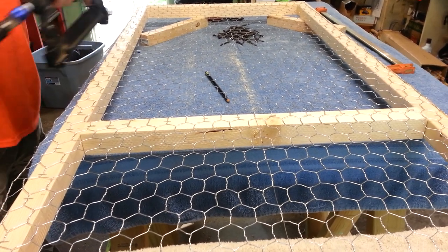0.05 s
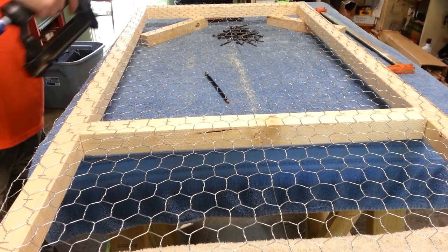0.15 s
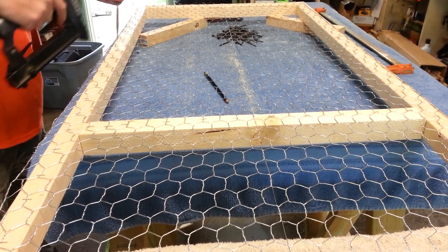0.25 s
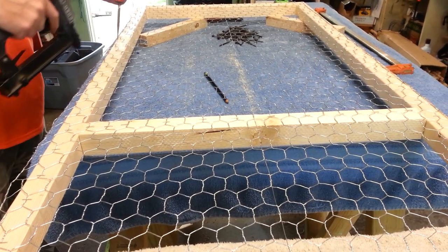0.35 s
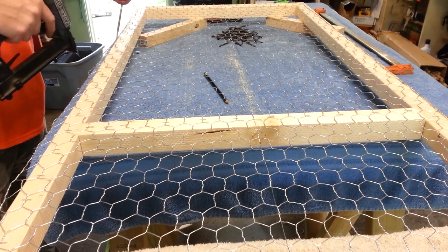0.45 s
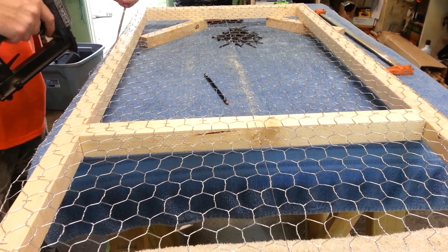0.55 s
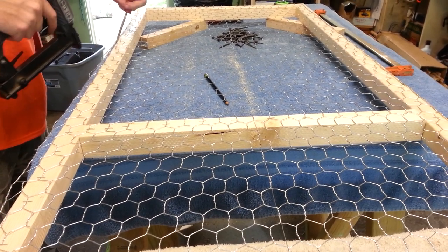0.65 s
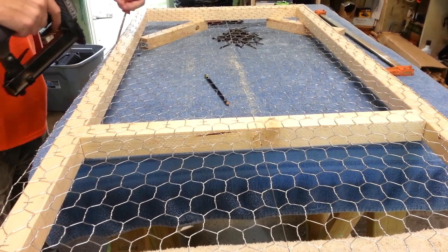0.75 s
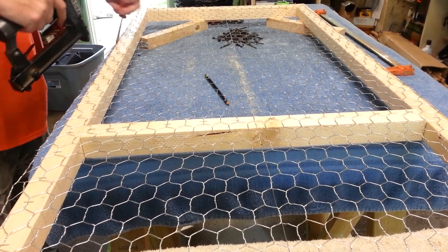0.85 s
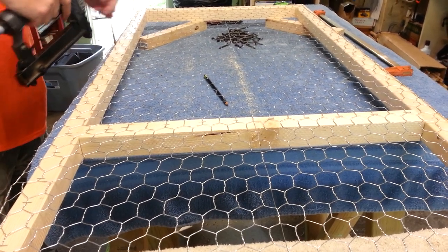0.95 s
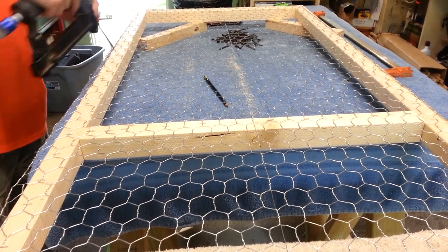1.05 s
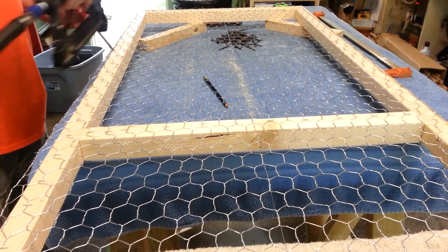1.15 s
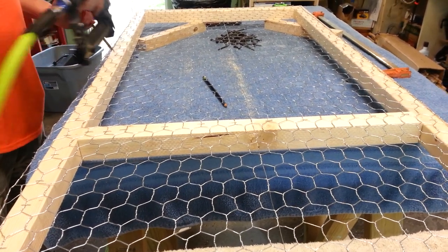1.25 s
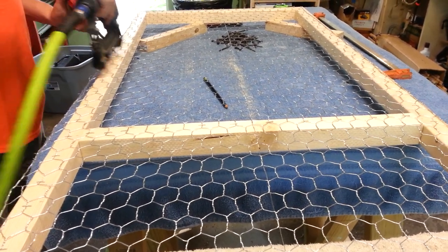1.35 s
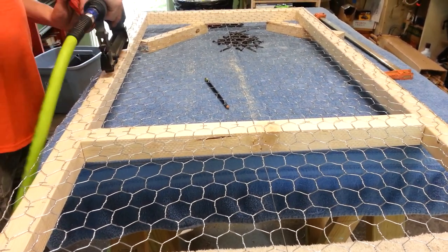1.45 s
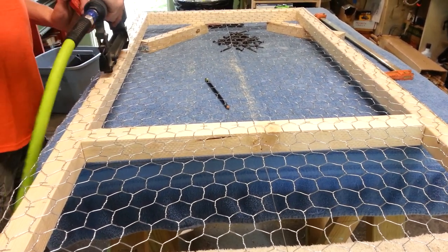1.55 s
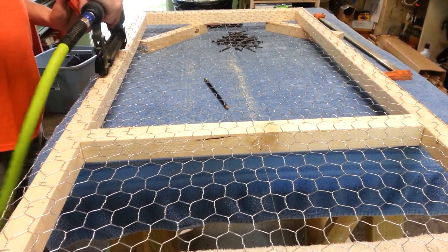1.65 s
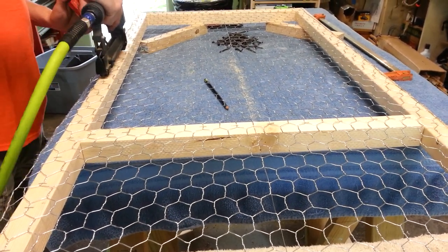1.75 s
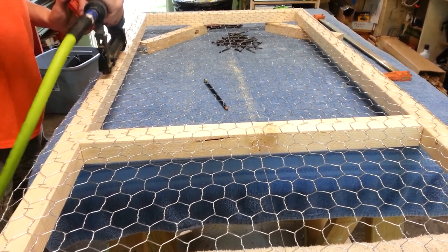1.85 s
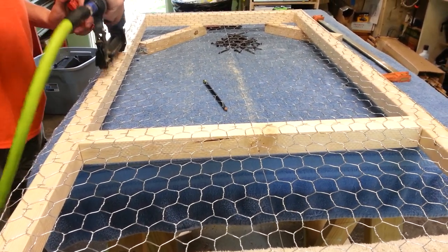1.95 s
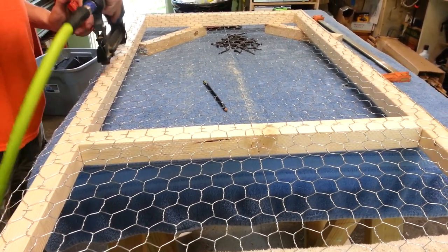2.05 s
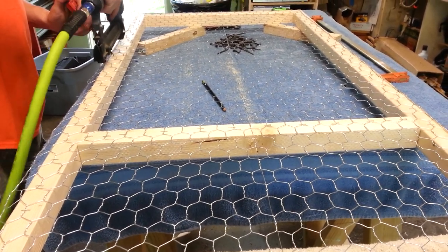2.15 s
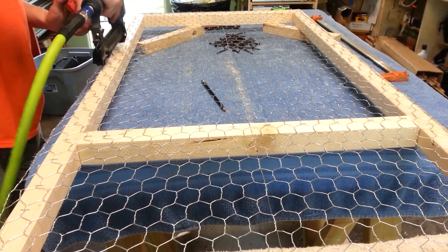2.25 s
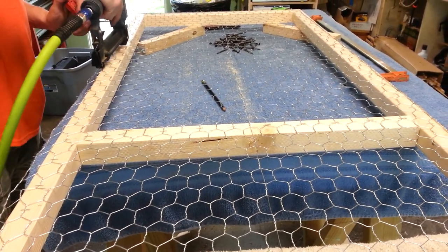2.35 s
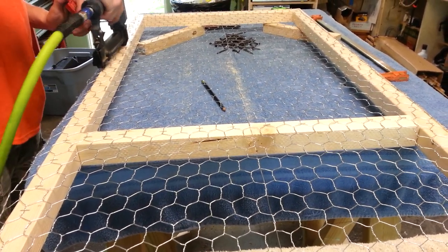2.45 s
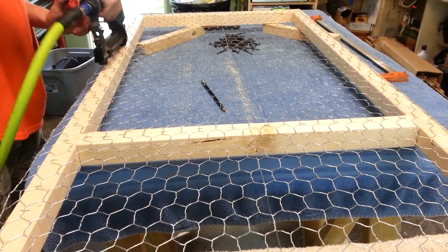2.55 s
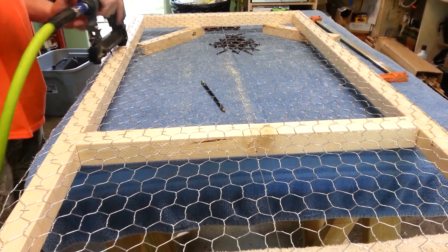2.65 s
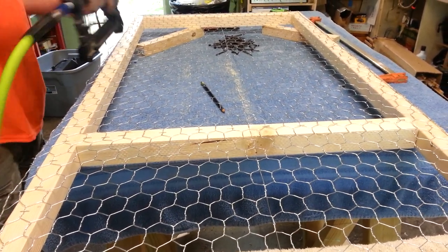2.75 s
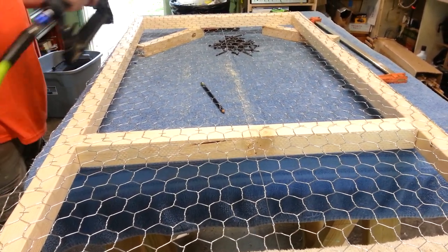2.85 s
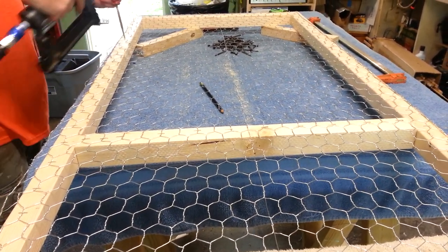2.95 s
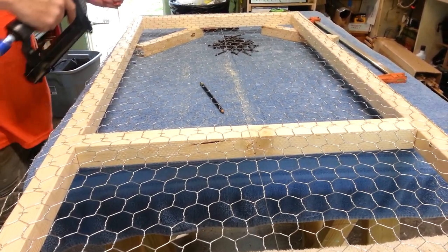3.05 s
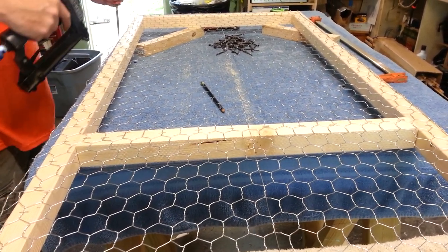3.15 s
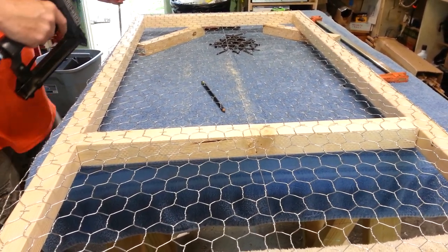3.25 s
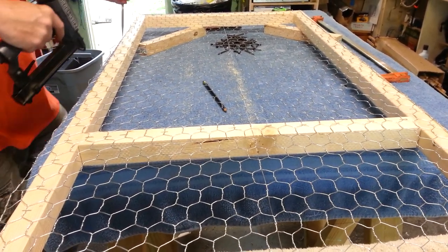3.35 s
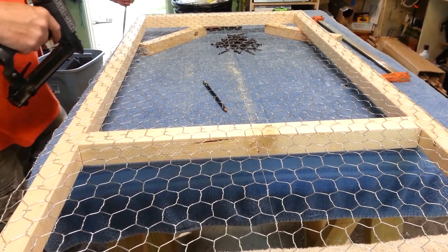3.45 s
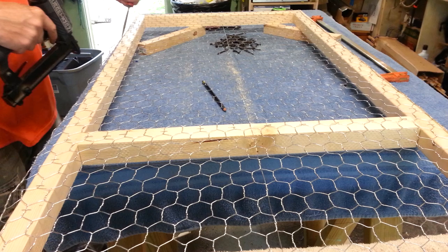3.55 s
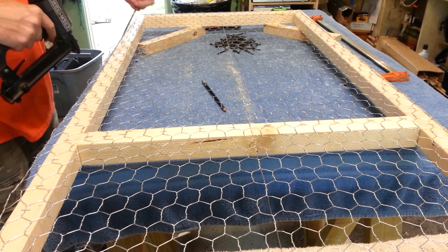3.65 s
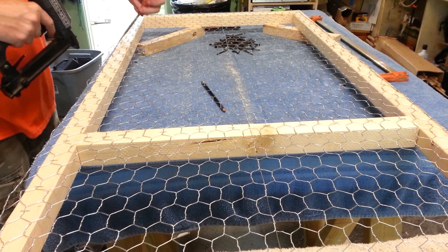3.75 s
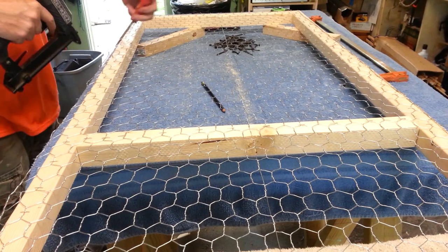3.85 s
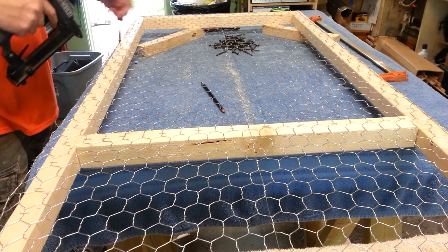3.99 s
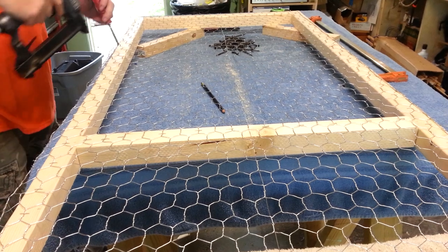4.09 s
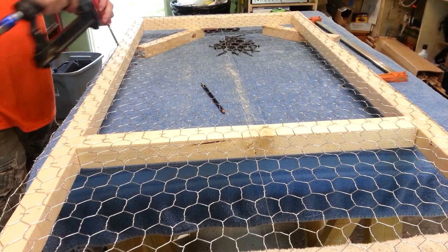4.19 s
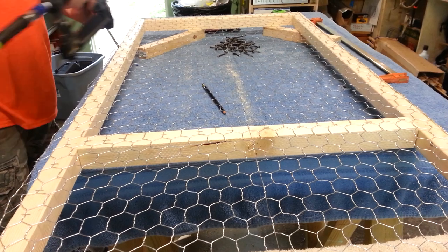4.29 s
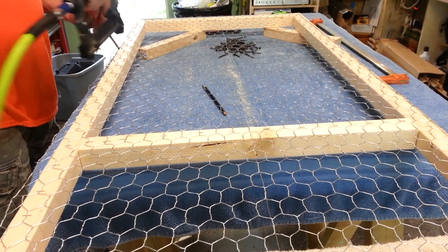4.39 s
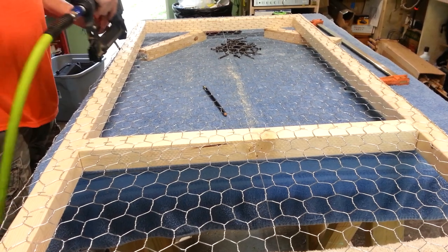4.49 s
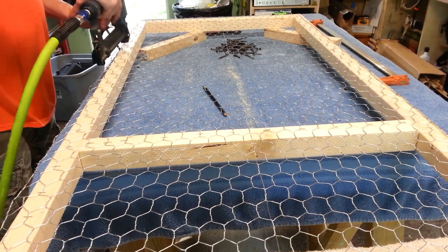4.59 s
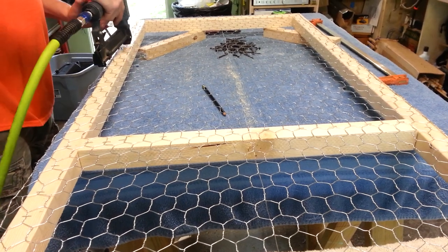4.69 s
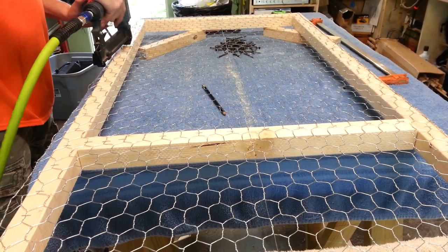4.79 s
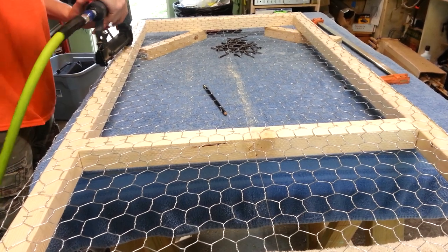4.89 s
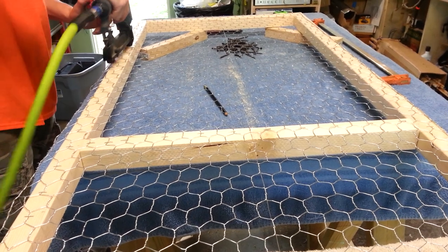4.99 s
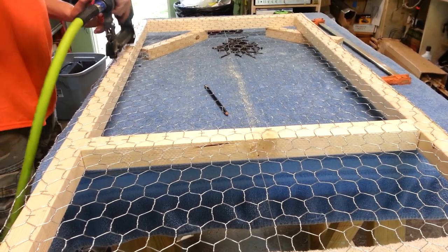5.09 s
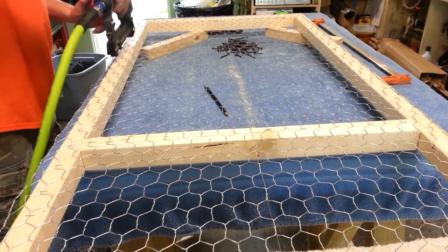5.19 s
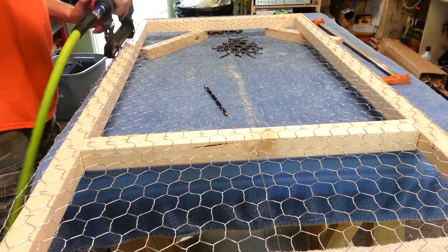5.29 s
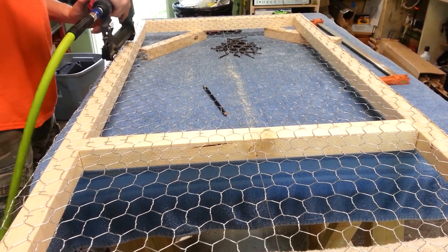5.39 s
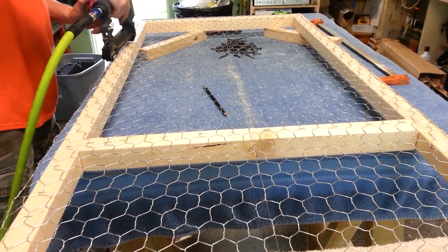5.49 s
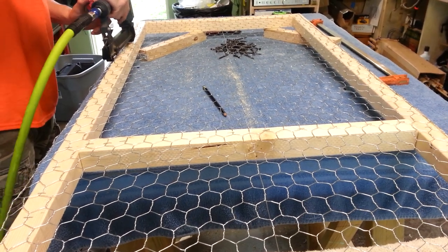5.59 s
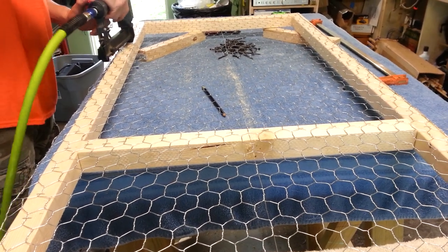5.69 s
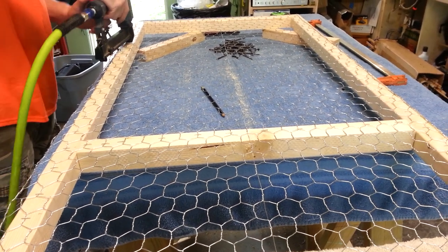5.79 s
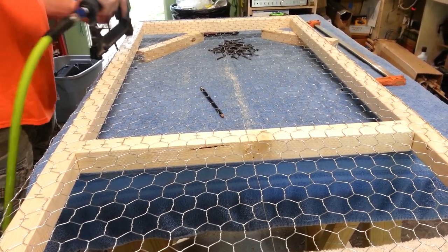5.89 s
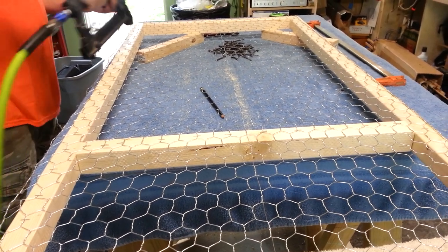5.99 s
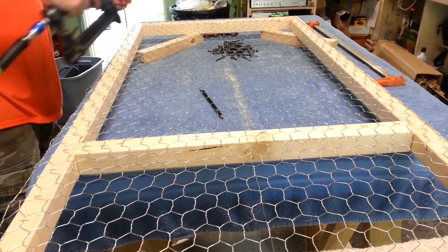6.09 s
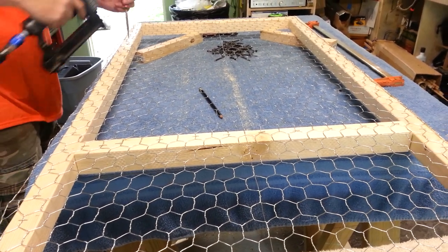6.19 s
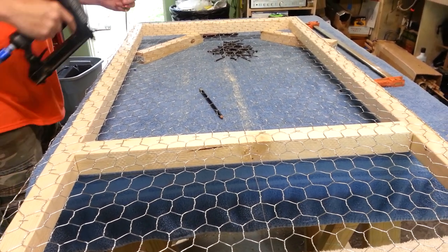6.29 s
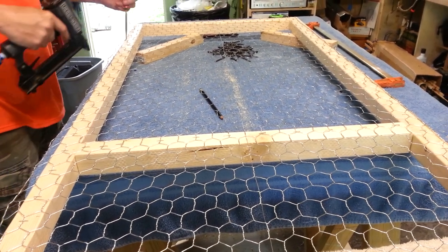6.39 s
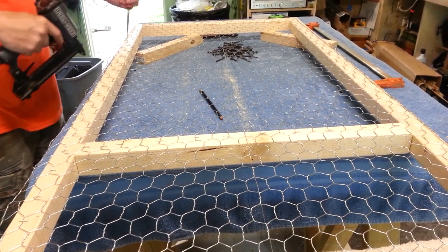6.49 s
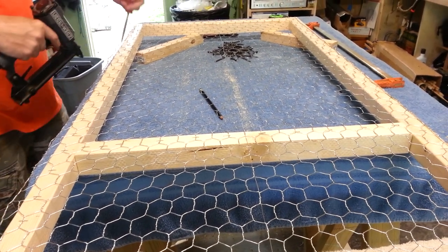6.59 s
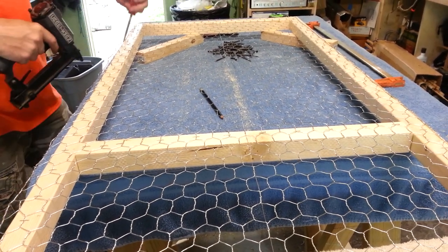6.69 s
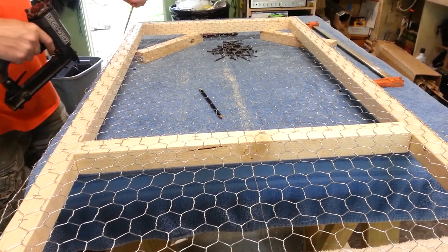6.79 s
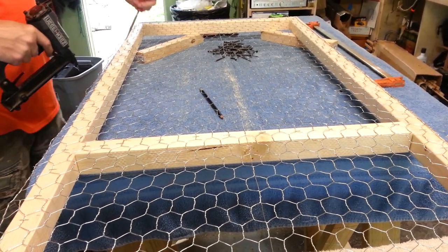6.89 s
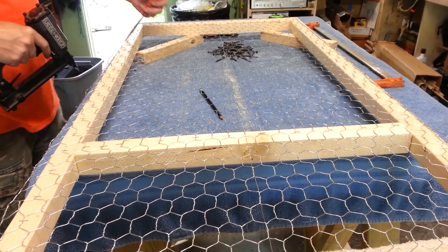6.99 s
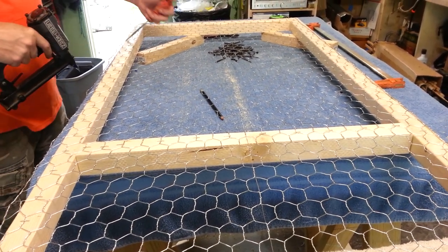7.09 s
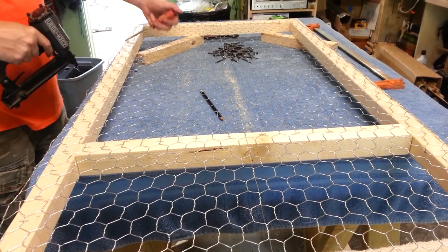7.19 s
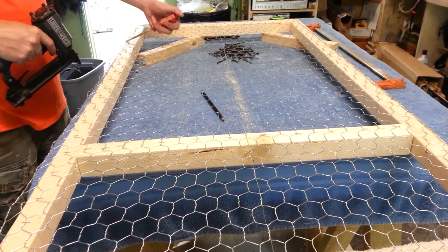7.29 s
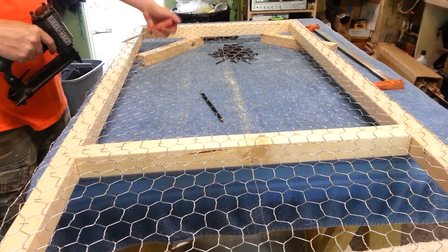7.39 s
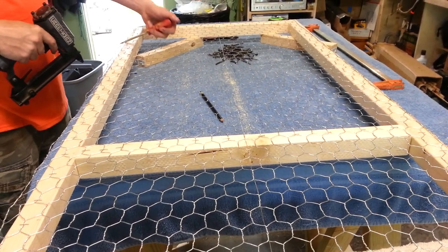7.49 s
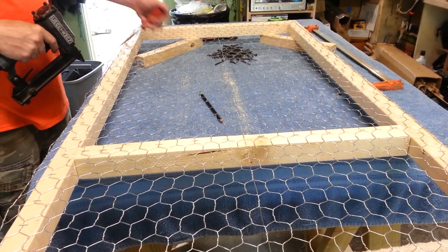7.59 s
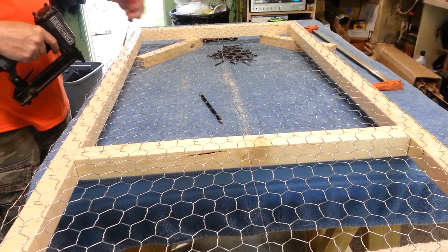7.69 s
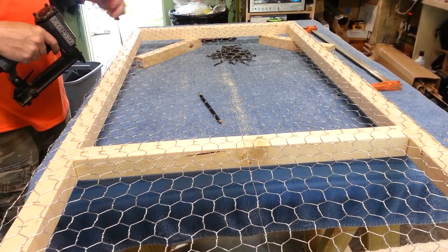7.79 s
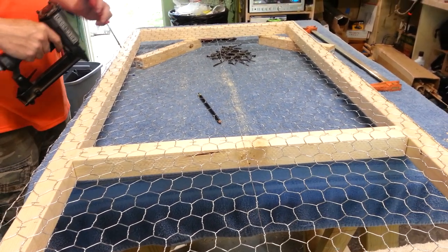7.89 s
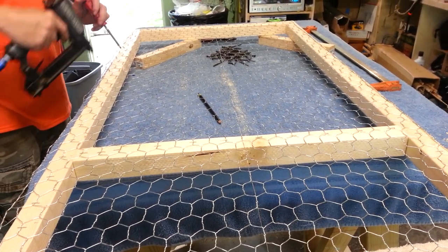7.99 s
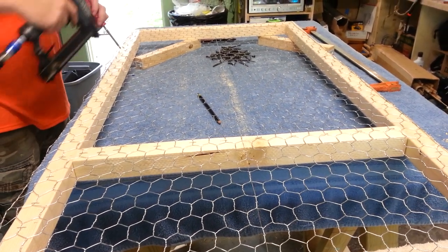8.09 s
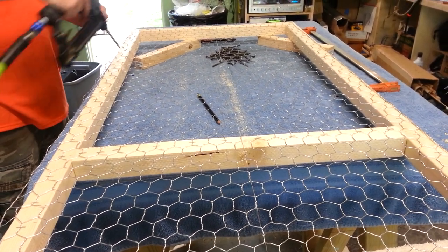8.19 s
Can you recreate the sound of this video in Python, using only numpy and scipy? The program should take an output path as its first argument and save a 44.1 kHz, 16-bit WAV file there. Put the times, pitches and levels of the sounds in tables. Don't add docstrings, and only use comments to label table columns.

```python
import sys
import numpy as np
from scipy import signal
from scipy.fft import rfft, irfft, next_fast_len
from scipy.io import wavfile
from scipy.ndimage import uniform_filter1d

SR = 44100
rng = np.random.default_rng(int(sys.argv[2]) if len(sys.argv) > 2 else 0)


def boost_factor(decibels):
    exponent = np.asarray(decibels, float) / 20
    return 10 ** exponent


def wav_record(signal):
    frames = np.transpose(np.atleast_2d(signal))
    bounded = np.clip(frames, -1, 1)
    quanta = np.round(bounded * 32767).astype(np.int16)
    wavfile.write(sys.argv[1], SR, quanta)


N = 363384
LEAD = 22050


def read(table, hz):
    at, value = np.transpose(table)
    return np.interp(np.log(np.maximum(hz, 1)), np.log(at), value)


def colour(x, table):
    log_gain = read(table, np.fft.rfftfreq(4096, 1 / SR)) * np.log(10) / 20
    cepstrum = irfft(log_gain)
    cepstrum[1:2048] *= 2
    cepstrum[2049:] = 0
    response = irfft(np.exp(rfft(cepstrum)))[None, :2048]
    response = response / np.sqrt(np.sum(response ** 2))
    return signal.fftconvolve(x, response, axes=1)[:, :x.shape[1]]


def ring(x, hz, width_hz):
    return signal.lfilter(*signal.iirpeak(hz, hz / width_hz, SR), x + 1e-18)


def steep(x, hz, width_hz):
    return ring(ring(x, hz, width_hz), hz, width_hz)


def fade(seconds, t60, rise):
    t = np.arange(int(seconds * SR)) / SR
    return (1 - np.exp(-t / rise)) * boost_factor(-60 * t / t60)


# pitch_hz, correlation (1 = same, 0 = unrelated)
LIKENESS = [(60, 0.33), (150, .9), (400, 0.91), (900, 0.074), (14000, 0)]


def pair(size):
    hz = np.fft.rfftfreq(size, 1 / SR)
    like = np.clip(read(LIKENESS, hz), -1, 1)
    mid, side = rfft(rng.standard_normal((2, size)))
    mid = mid * np.sqrt((1 + like) / 2)
    side = side * np.sqrt((1 - like) / 2)
    return hz, np.array([mid + side, mid - side])


def burst(t60, rise):
    noise = irfft(pair(SR // 2)[1], SR // 2)
    return fade(.5, t60, rise) * noise


def bands(size, gain):
    fast = next_fast_len(size)
    hz, noise = pair(fast)
    out = 0
    for centre in 22 * 2 ** np.arange(0, 10, .5):
        share = np.clip(1 - np.abs(2 * np.log2(np.maximum(hz, 1) / centre)), 0, 1)
        out = out + irfft(noise * share, fast)[:, :size] * gain(centre)
    return out


def walk(rate_hz, size):
    hold = int(SR / rate_hz)
    steps = np.repeat(rng.standard_normal(size // hold + 1), hold)
    return 1.2 * uniform_filter1d(steps, hold)[:size]


def add(out, start_s, sound, level_db, pan_db):
    i = LEAD + int(start_s * SR)
    piece = sound[..., :out.shape[1] - i]
    out[:, i:i + piece.shape[-1]] += piece * boost_factor(level_db + np.array([[.5], [-.5]]) * pan_db)


# pitch_hz, level_db (per Hz)
VALVE_TONE = [(180, -35.5), (300, -3), (1440, -8.5), (2730, 1.5), (5620, -6), (8740, -2.5), (13600, -2.5),
              (15000, -18.5)]
# pitch_hz, level_db (per Hz)
FRAME_TONE = [(15, -48.5), (25, -20), (128, -19.5), (191, -5), (264, -11), (637, -12.5), (903, -12),
              (1030, -7.5), (1120, -7), (1860, -3), (5420, -10.5), (10300, -18.5), (15000, -37)]
# pitch_hz, width_hz, level_db
FRAME_NOTES = [(1040, 11, -6), (1450, 760, -3.5), (1740, 37, -7.5), (2050, 36, -1.5), (2680, 62, -0.5),
               (2930, 15, -3.5), (3280, 85, -4), (3560, 16, -8), (4057, 120, -13)]
# start_s, level_db (peak), mesh_treble_db, ring_t60_s, valve_hiss_db
DRIVER_BLOWS = [
    (1.9081, -4.5, -2, 0.14, -13.5),
    (2.559, -7, -3.5, 0.13, -15),
    (4.982, -1, 0.5, 0.17, -12),
    (5.741, -7, -3, 0.12, -16.5),
]


def blows(out):
    pan_db = 0.5
    t = np.arange(SR // 2) / SR
    damped = np.exp(-(t / 0.036) ** 2)
    for start_s, level_db, treble_db, t60, valve_db in DRIVER_BLOWS:
        valve = colour(burst(0.83, 0.0006) * (t < .03), VALVE_TONE) * fade(.5, 9., 0.0012)
        add(out, start_s - .016, valve, valve_db, pan_db)
        leak = colour(burst(0.2, 0.0034), BLAST_TONE)
        add(out, start_s, leak, -18.5, pan_db)

        shake = burst(1.56 * t60, 0.0029) * damped * boost_factor(4.3 * walk(110, SR // 2) - 1.5)
        shake = colour(shake, [(900, -2.0), (2200, -0.5), (2900, 0.5), (4200, treble_db)])
        rings = sum(boost_factor(db) * ring(shake, hz, 2.0 * width_hz) for hz, width_hz, db in FRAME_NOTES)
        add(out, start_s + .0015, colour(shake + boost_factor(1.5) * rings, FRAME_TONE), level_db + 8.0, pan_db)

        crack = colour(burst(.02, .0004), BLAST_TONE)
        add(out, start_s + 0.0018, crack, level_db + 3.0, pan_db)
        kick = -steep(fade(.1, 0.0035, 0.00015), 787.0, 1500.)
        add(out, start_s + 0.00031, kick, level_db + 21.5, 0)
        thump = steep(burst(0.06, .001), 430.0, 540.0)
        add(out, start_s + 0.001, thump, level_db + 8.0, 0)


# pitch_hz, level_db (per Hz)
BLAST_TONE = [(180, -31), (300, -8), (841, -12), (2440, 1), (2780, -0.5), (4390, -3), (5620, -4.5),
              (8740, -3), (14000, -5), (15000, -17.5)]
# ago_s, under_full_scale_db, blast_t60_s
SHOT_BEFORE = (.15, 7.2, 0.28)
# start_s, level_db (peak), pan_db (left minus right), blast_t60_s, piston_knock_db
AIR_BLASTS = [
    (2.0174, -9.5, 0, 0.21, -9.5),
    (2.6707, -9, 0, 0.16, -5),
    (5.094, -9.5, 1.5, 0.2, -8.5),
    (5.8391, -11, 0, 0.3, -10),
]


def exhausts(out):
    ago_s, under_db, before_t60 = SHOT_BEFORE
    emptying = np.exp(-(np.arange(SR // 2) / SR / 0.069) ** 2)
    before = (-ago_s, -under_db, 0, before_t60, -6.5)
    for start_s, level_db, pan_db, t60, knock_db in [before, *AIR_BLASTS]:
        jet = burst(1.75 * t60, .0005) * emptying + boost_factor(-7.5) * burst(.05, 0.00025)
        jet = colour(jet * boost_factor(0.44 * walk(120, SR // 2)), BLAST_TONE)
        add(out, start_s - .001, jet, level_db + 7, pan_db)
        puff = steep(fade(.2, 0.0071, 0.0021), 207.0, 190.)
        add(out, start_s - .003, puff, level_db + 29.5, 0)
        metal_knock = ring(fade(.2, 0.0016, .0001), 1600.0, 760.0)
        add(out, start_s + 0.025, metal_knock, level_db + 37 + knock_db, pan_db)
        body_knock = steep(fade(.2, 0.017, 0.0027), 290., 400.0)
        add(out, start_s + .022, body_knock, level_db + 28.0 + knock_db, 0)


# pitch_hz, level_db (per Hz)
WIRE_TONE = [(350, -33.5), (600, 5), (744, -11.5), (887, 1.5), (1500, -3.5), (2340, -10), (3190, -7),
             (4460, -21.5), (5250, -29.5), (10400, -35.5), (15000, -62)]
# pitch_hz, width_hz, level_db
WIRE_NOTES = [(1090, 130, -6.5), (1450, 81, -2), (1720, 78, -4), (2200, 9.3, -30), (2760, 170, -6),
              (3240, 110, 0.5), (4470, 160, -1.5)]
# start_s, swell_s, level_db (peak), release_t60_s, pan_db (left minus right)
HOOK_DRAGS = [(0.582, 0.0065, -40, 0.15, 0), (0.63, 0.049, -38, 0.26, 0.5), (0.851, 0.024, -23, 0.28, -0.5),
              (0.885, 0.041, -25.5, 0.071, 1), (3.63, 0.052, -39.5, 0.13, -1),
              (3.773, 0.0059, -30.5, 0.17, -2.5), (3.823, .008, -25.5, 0.54, -1.5),
              (3.86, 0.037, -21, 0.34, 0), (5.974, 0.023, -26.5, 0.14, 0), (7.252, 0.0034, -25.5, 0.2, 2),
              (7.43, 0.0094, -21.5, 0.1, 0.5), (7.45, .01, -36, 0.42, 4)]


def scrapes(out):
    t = np.arange(SR // 2) / SR
    for start_s, swell_s, level_db, t60, pan_db in HOOK_DRAGS:
        growing_db = 11.5 * (1 - t / max(swell_s, .001))
        releasing_db = 60 * (t - swell_s) / max(t60, .02)
        slack_db = np.where(t < swell_s, growing_db, releasing_db)

        slip_now = rng.random(len(t)) < 7000 / SR
        grip = slip_now * boost_factor(0.87 * np.minimum(rng.exponential(size=len(t)), 4))
        slips = grip * rng.standard_normal((2, len(t)))
        slips = slips / slips.std() * boost_factor(level_db - slack_db) * np.clip(t / 0.0019, 0, 1)

        rings = sum(boost_factor(db) * ring(slips, hz, 1.52 * width_hz) for hz, width_hz, db in WIRE_NOTES)
        rings = rings + boost_factor(-4.5) * ring(slips, 4500.0, 1000.)
        wire = colour(slips + boost_factor(3.0) * rings, WIRE_TONE)
        wood = steep(slips.mean(0) * boost_factor(13 + 0.49 * slack_db), 360.0, 670.0)
        bite = steep(slips * boost_factor(-3.5), 3200.0, 1900.0)
        add(out, start_s, wire + wood + bite, 0, pan_db)


# start_s, level_db (peak), pitch_hz, thud_db
HOOK_TAPS = [(0.287, -35.5, 1150, -6.5), (0.488, -26, 1460, -12.5), (0.508, -26.5, 1090, -11),
             (0.58, -43.5, 1390, 5), (0.673, -41.5, 1430, 9), (0.854, -21, 1580, -20),
             (1.038, -31, 974, -13.5), (1.12, -30, 1420, -10), (1.369, -40, 1340, -17),
             (3.048, -30, 2600, -6), (3.298, -33.5, 1040, -14), (3.429, -29.5, 3240, -35),
             (3.526, -35.5, 800, 1), (3.556, -24.5, 2850, -38), (3.638, -31, 1510, -29),
             (3.673, -46, 1180, -25), (3.778, -28, 1540, -28), (3.825, -25.5, 3970, -0.5),
             (4.4, -28, 946, -13), (6.269, -34, 996, -6), (6.849, -37.5, 1430, -4),
             (6.869, -34.5, 1910, -11), (6.935, -32.5, 950, -6.5), (6.962, -28.5, 1510, -11),
             (7.239, -23.5, 3300, -24), (7.254, -25, 1000, -1.5), (7.434, -42, 1450, -24.5),
             (7.692, -27.5, 1430, -12)]
# start_s, level_db (peak), pitch_hz, edge_db
NOSE_TAPS = [(0.26, -36.5, 1420, -17), (1.461, -20.5, 1230, -20), (1.472, -30, 1300, -8.5),
             (1.506, -26.5, 1200, -17.5), (1.681, -32.5, 1160, -15), (1.723, -37, 2390, -11),
             (1.82, -28, 3000, -22.5), (1.836, -26, 2250, -11), (1.863, -42, 2550, -4.5),
             (2.351, -31, 3760, -26.5), (2.375, -34, 4800, -4), (2.386, -31.5, 2630, -8),
             (2.49, -25, 1500, -18), (3.224, -32, 2960, -14), (4.774, -32.5, 2400, -12),
             (4.894, -21.5, 930, -16.5), (5.385, -26.5, 937, -22), (5.416, -29, 950, -17),
             (5.495, -33.5, 4230, -11), (5.586, -29, 2920, -9), (8.195, -40.5, 2680, -17)]


def ticks(out):
    hook = [(start_s, db, hz, thud_db, -29, 0.008) for start_s, db, hz, thud_db in HOOK_TAPS]
    nose = [(start_s, db, hz, -12, edge_db, .007) for start_s, db, hz, edge_db in NOSE_TAPS]
    for start_s, level_db, hz, thud_db, edge_db, contact_s in hook + nose:
        touch = burst(9 * contact_s, 0.00082)[:, :SR // 5]
        metal = boost_factor(5.5) * steep(touch, hz, hz / 2.15) + boost_factor(-0.2) * steep(touch, 2200.0, 3000.0)
        thud = boost_factor(thud_db + 17.5) * steep(touch, 510.0, 500.)
        edge = boost_factor(edge_db + 11) * steep(touch * fade(.2, 0.029, .0002), 9500., 9000.)
        add(out, start_s, metal + thud + edge, level_db + 2.0, -2.5)


# start_s, level_db (peak), pitch_hz, ring_t60_s
FRAME_BUMPS = [(0.285, -36, 374, 0.055), (3.046, -28.5, 273, 0.097), (3.526, -31, 447, 0.029),
               (4.4, -41.5, 323, 0.048), (6.269, -30, 382, 0.067), (6.848, -37, 588, 0.052),
               (6.936, -32.5, 304, 0.062), (7.254, -24, 500, 0.087), (7.432, -24, 890, 0.054),
               (7.491, -25, 598, 0.15), (7.601, -36, 504, 0.14)]


def bumps(out):
    for start_s, level_db, hz, t60 in FRAME_BUMPS:
        push = fade(.3, 0.0029, 0.0003)
        width_hz = 2.0 / max(t60, .01)
        wood = ring(push, hz, width_hz) + boost_factor(-5.5) * ring(push, 0.66 * hz, 1.4 * width_hz)
        add(out, start_s, wood / np.abs(wood).max(), level_db - 0.5, 0)


# middle_s, half_length_s, level_db
HISS_SWELL = (3.905, 0.036, -34)


def swish(out):
    middle_s, half_s, level_db = HISS_SWELL
    t = np.arange(-SR // 8, SR // 8) / SR
    hiss = steep(rng.standard_normal((2, len(t))), 10000., 9000.)
    add(out, middle_s + t[0], hiss * np.exp(-(t / half_s) ** 2), level_db, 0)


# pitch_hz, t60_s
ECHO_T60 = [(60, 0.21), (200, 0.78), (600, 0.42), (2000, 0.31), (4500, 0.3), (7000, 0.26), (14000, 0.24)]
# pitch_hz, level_db
ECHO_LEVEL = [(60, -10), (250, -1), (1000, 4.5), (3000, 5), (6000, -0.5), (14000, -2)]


def room(dry):
    tail = bands(SR, lambda hz: boost_factor(read(ECHO_LEVEL, hz)) * fade(1, read(ECHO_T60, hz), 0.0036))
    tail /= np.sqrt(np.sum(tail ** 2) / 2)
    return signal.fftconvolve(dry, tail, axes=1)[:, :dry.shape[1]]


# pitch_hz, level_db (per Hz)
FLOOR_TONE = [(13, -67), (22, -39.5), (174, -2), (262, -15), (373, -17), (561, -16), (717, -18), (799, -15),
              (1340, -18.5), (1710, -24), (2370, -18.5), (3200, -23.5), (4200, -27), (5670, -35),
              (14700, -34.5)]
# time_s, level_db
SHUFFLING = [(0.0, -45.5), (0.48, -50.5), (0.82, -48), (1.28, -50.5), (1.9, -46.5), (2.41, -47),
             (2.73, -45.5), (3.44, -47), (3.95, -47), (4.4, -48.5), (5.05, -44), (5.76, -46), (5.9, -39),
             (6.099, -45), (6.79, -50), (7.37, -45.5), (8.24, -50.5)]


def background():
    stir_db = np.interp(np.arange(N) / SR, *np.transpose(SHUFFLING))
    rumble_db = 0.4 + 0.25 * (stir_db + 45) + 1.2 * walk(2.2, N)

    def gain(hz):
        low = np.clip(np.log2(400 / hz), 0, 1)
        shuffle_db = (stir_db + 51.5) * np.clip(np.log2(9000 / hz), 0, 1)
        swell_db = low * rumble_db + (1 - low) * shuffle_db
        return boost_factor(read(FLOOR_TONE, hz) + swell_db + 0.69 * walk(6.2, N))

    hum = steep(rng.standard_normal(N), 197, 30.) * boost_factor(-30.5 + 3.0 * walk(2.7, N))
    wisp = steep(rng.standard_normal((2, N)), 4350., 450.) * boost_factor(-50 + 3.5 * walk(5, N))
    return boost_factor(-22) * bands(N, gain) + wisp + hum


def scene():
    near = np.zeros((2, LEAD + N))
    for source in (blows, exhausts, ticks, scrapes, bumps, swish):
        source(near)
    boom = ring(near, 198., 11.0)
    heard = near + boost_factor(-6.0) * room(near) + boost_factor(-2) * boom
    return heard[:, LEAD:] + background()


def duck(x):
    memory_s, bite_level, strength = 0.12, 0.88, 0.43
    keep = np.exp(-1 / (memory_s * SR))
    loud = signal.lfilter([1 - keep], [1, -keep], np.abs(x).mean(0))
    return x * (1 + (loud / bite_level) ** 2) ** (-strength)


def band_limit(x):
    return signal.sosfilt(signal.butter(12, 15580, fs=SR, output="sos"), x)


# pitch_hz, level_db
MIC_TONE = [(200, -2), (3600, -1), (4500, 1.5), (5150, -2), (8000, 0), (14000, -1.5)]
# pitch_hz, left_minus_right_db
PORT_LEAN = [(125, 2.5), (500, 4.5), (2000, -2), (4500, 4), (12000, 3.5)]


def record(dry):
    hz = np.geomspace(100, 16000, 80)
    ports = []
    for channel, side in zip(dry, (.5, -.5)):
        tone = np.c_[hz, read(MIC_TONE, hz) + side * read(PORT_LEAN, hz)]
        ports.append(colour(channel[None], tone))
    bass_cut = signal.butter(2, 45., "high", fs=SR, output="sos")
    thin = signal.sosfilt(bass_cut, np.vstack(ports) * boost_factor(-2.5))
    clipped = np.clip(duck(thin), -1.02, 1.02)
    top_cut = signal.ellip(8, .2, 60, 14600, fs=SR, output="sos")
    return band_limit(signal.sosfilt(top_cut, clipped))


dry = scene()
out = record(dry)
wav_record(out)
```